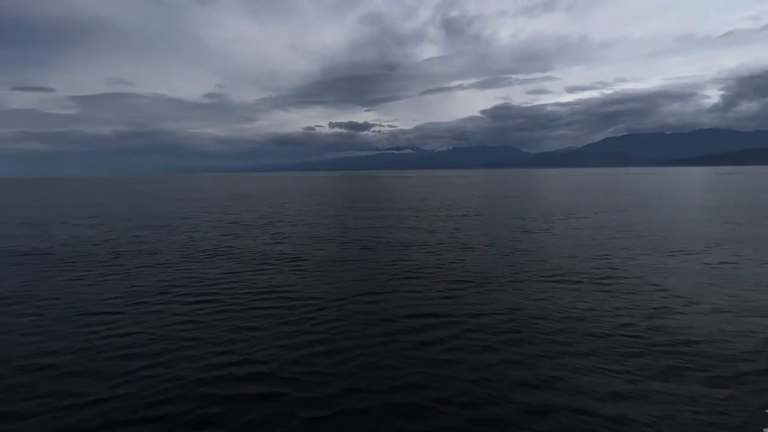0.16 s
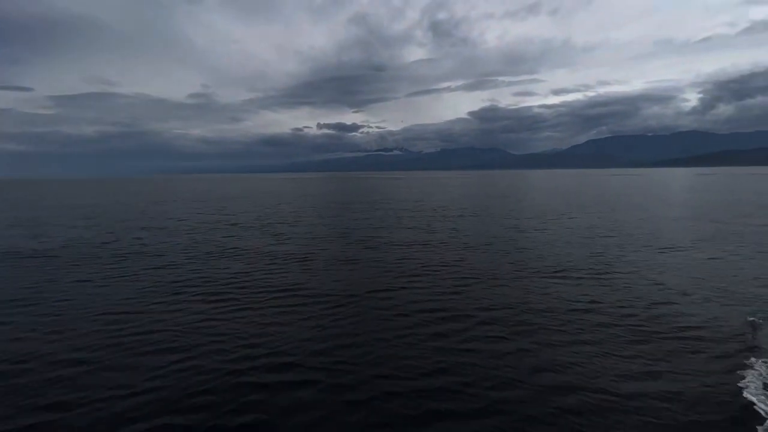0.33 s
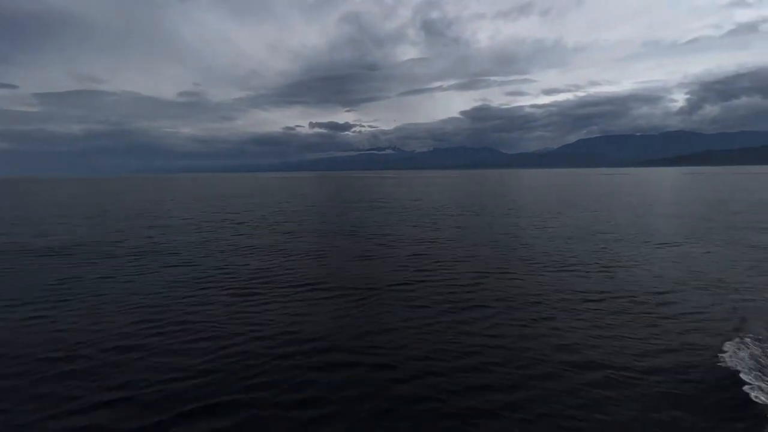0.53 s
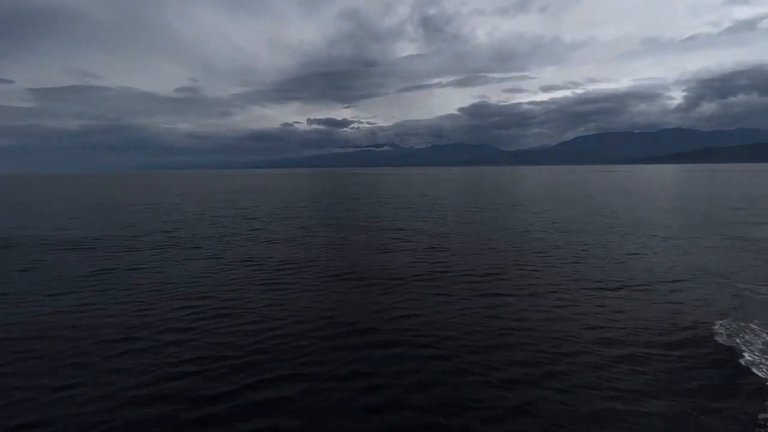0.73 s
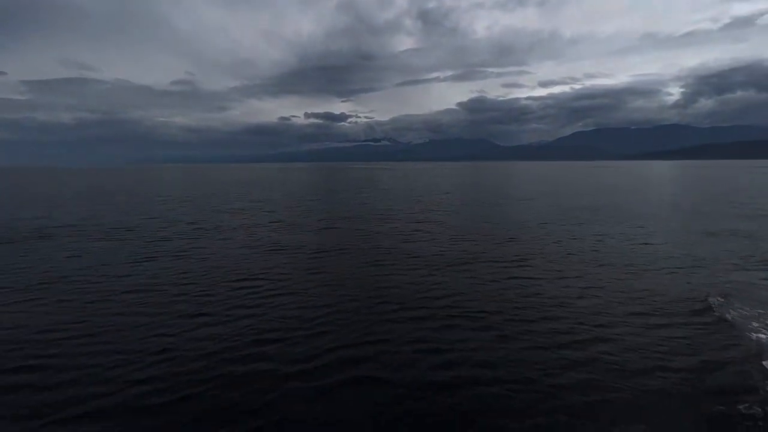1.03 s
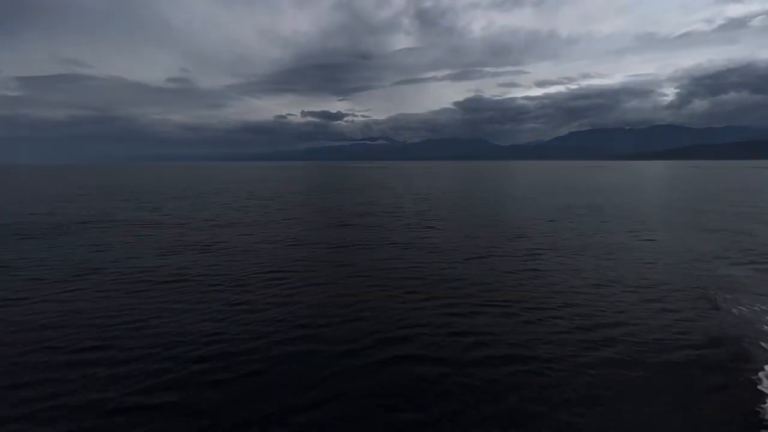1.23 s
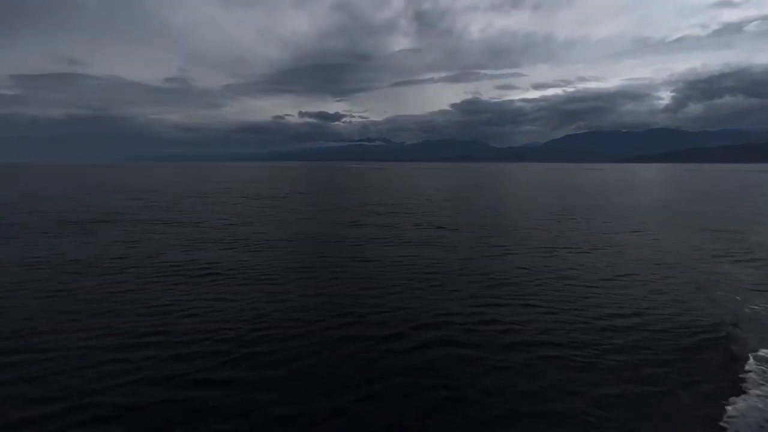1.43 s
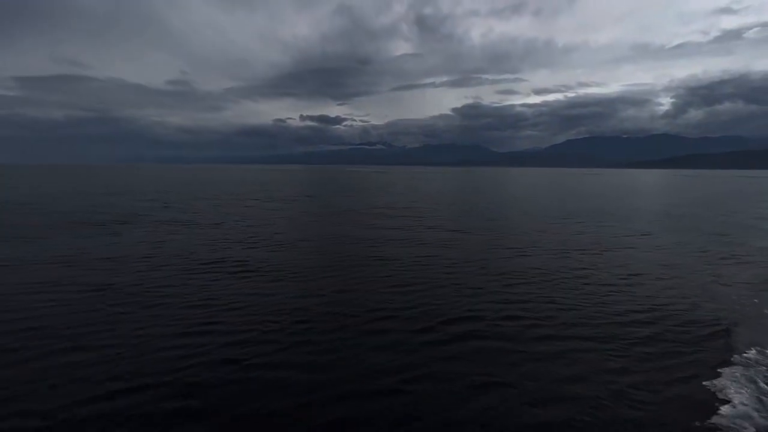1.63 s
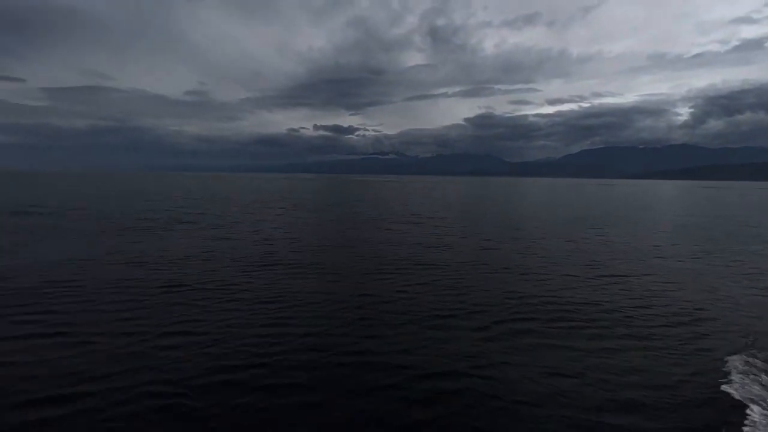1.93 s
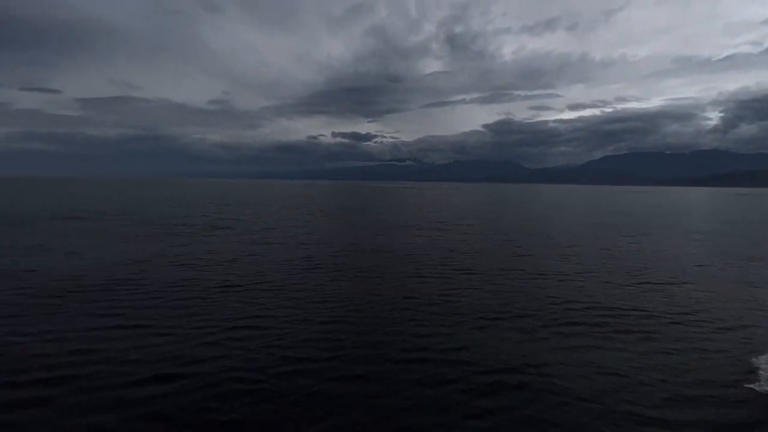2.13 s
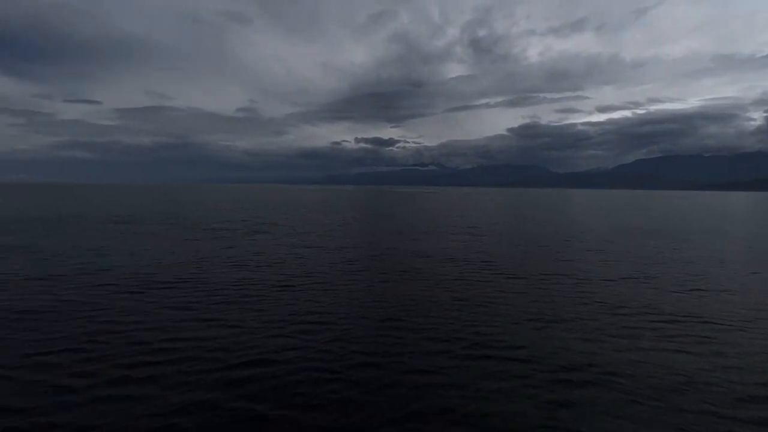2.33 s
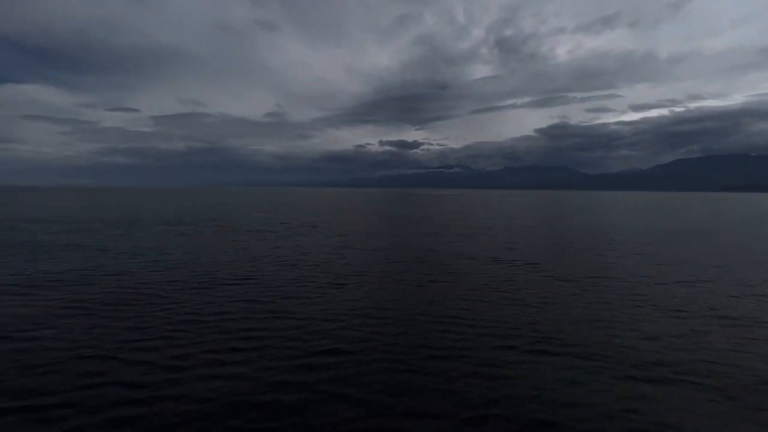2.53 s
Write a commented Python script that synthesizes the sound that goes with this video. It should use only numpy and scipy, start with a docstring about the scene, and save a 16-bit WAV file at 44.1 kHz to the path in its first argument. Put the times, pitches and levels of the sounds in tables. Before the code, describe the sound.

Water churns and bubbles along a moving boat's hull, mostly to the left, over a low engine drone and wind buffeting the microphones; hard thumps come early, then a wave crest breaks in hissing, splashing foam.

```python
"""On the deck of a moving boat, with two microphone ports open to the wind and the bow wave off to the left.
From the start the engine drones below, wind rumbles and buffets the ports, and bubbly water churns along the hull.
At about 0.6 s comes a hard thump, then a cluster of them from 0.8 to 0.9 s; a few air pockets gurgle in the churn.
At about 1 s a crest breaks: a long foam hiss with splashing drops swells, spurts and dies away by 2.6 s.
Engine and hums are sine tones, thumps and gurgles short sines, wind coloured noise, water noise plus bubbles."""
import sys
import numpy as np
from scipy import signal
from scipy.fft import rfft, irfft, next_fast_len
from scipy.io import wavfile
from scipy.ndimage import uniform_filter1d, map_coordinates

SR = 44100
rng = np.random.default_rng(int(sys.argv[2]) if len(sys.argv) > 2 else 0)


def dump_mix(stems):
    """Bounce the given channels to the path in sys.argv[1] as a 16-bit WAV at rate SR."""
    frames = np.atleast_2d(stems).T  # one column per channel
    limited = np.clip(frames, -1, 1)  # hard clip at full scale
    pcm = np.round(limited * 32767).astype(np.int16)
    wavfile.write(sys.argv[1], SR, pcm)


N = 117747


def amp(db):
    """Decibels to gain."""
    return 10 ** (np.asarray(db) / 20)


def unit(x):
    """Scaled to rms 1."""
    return x / np.sqrt(np.mean(x ** 2) + 1e-20)


def seconds():
    """Time of every sample, in seconds."""
    return np.arange(N) / SR


def along(points, hz):
    """Values of (frequency, value) points, interpolated on a log frequency axis."""
    f, v = np.transpose(points)
    return np.interp(np.log(hz + 1), np.log(f + 1), v)


def sides(db):
    """Left and right gains for a level difference, left over right."""
    return amp(np.array([[.5], [-.5]]) * db)


def wobble(rate):
    """A smooth random curve with this many knots a second."""
    return map_coordinates(rng.standard_normal(1024), [np.arange(N) * rate / SR + 2], mode="wrap")


def filtered(x, response):
    """x shaped by a (complex) response of frequency."""
    m = next_fast_len(N + SR // 2)
    return irfft(rfft(x, m) * response(np.fft.rfftfreq(m, 1 / SR)), m)[..., :N]


# firing rate and its octave, at the deck: one rms level each [dB]
ENGINE_LEVELS = [-24, -46.5]
# weaker hums of the machinery: (frequency [Hz], rms level [dB])
MACHINE_HUMS = [(44, -38.5), (139, -37)]
ENGINE_HZ = 73.06
ENGINE_LEAD_S = 0.00073  # the left port hears the drone first


def engine():
    """A steady low drone at the firing rate and its octave, wavering slightly, with weaker hums beside it."""
    turns = np.cumsum(ENGINE_HZ * (1 + 0.0016 * wobble(4.3))) / SR
    turns = turns + ENGINE_HZ * ENGINE_LEAD_S * np.array([[.5], [-.5]])
    drone = 0
    for harmonic, db in enumerate(ENGINE_LEVELS, start=1):
        drone = drone + amp(db + 0.73 * wobble(10.47)) * np.sin(2 * np.pi * harmonic * turns)
    hums = 0
    for hz, db in MACHINE_HUMS:
        level = amp(db + wobble(7.3))
        hums = hums + level * np.sin(2 * np.pi * hz * seconds() + wobble(8.06))
    return np.sqrt(2) * (drone + hums)  # from rms to peak


# wind at the two ports: (frequency [Hz], share common to both [0-1])
COMMON_WIND = [(40, 0), (55, 0.07), (105, 0.07), (160, 0.39), (300, 0.56)]


def on_the_ports(spectrum):
    """Lumpy wind noise of rms 1, partly different on each port."""
    x = filtered(rng.standard_normal((3, N)), lambda hz: amp(along(spectrum, hz)))
    alike = lambda hz: np.clip(along(COMMON_WIND, hz), 0, 1)
    common = filtered(x[0], lambda hz: np.sqrt(alike(hz)))
    separate = filtered(x[1:], lambda hz: np.sqrt(1 - alike(hz)))
    lumps = amp(1.05 * np.array([wobble(34.96), wobble(34.73)]))
    return unit((common + separate) * lumps)


# colour of the steady wind: (frequency [Hz], relative level per Hz [dB])
RUMBLE_COLOUR = [(20, -37), (32, -22), (42, -9), (55, 5), (72, -0.5), (95, 5.5), (140, -3), (200, -3),
                 (300, -6.5), (450, -19), (800, -28), (2000, -72)]
# colour of the gusts: (frequency [Hz], relative level per Hz [dB])
GUST_COLOUR = [(40, -15), (75, 3), (110, 2), (165, 1), (300, -7.5), (450, -14), (800, -29.5), (2000, -58)]
# gusts on the ports: (time [s], half length [s], level [dB], left over right [dB])
PORT_GUSTS = [(0.006, 0.023, -25.5, 5.5), (0.12, 0.044, -25, 1.5), (0.307, 0.038, -30, 5),
              (0.617, 0.022, -23, -3), (0.728, 0.038, -25.5, -4.5), (0.834, 0.062, -24.5, 0),
              (1.138, .05, -25.5, -3), (1.23, 0.019, -24.5, 1), (1.472, 0.025, -24.5, 5.5),
              (1.803, 0.061, -22.5, -4), (1.972, 0.074, -21.5, 3), (2.152, 0.045, -26.5, -4.5),
              (2.421, 0.042, -25, 12), (2.536, 0.055, -26, -2)]
WIND_DB = -28  # the steady rumble


def wind():
    """A steady deep rumble, and gusts that buffet the ports higher up: noise whose power swells in brief bumps."""
    t = seconds()
    gust_power = 0
    for s, half, db, pan in PORT_GUSTS:
        bump = np.exp(-((t - s) / half) ** 2)
        gust_power = gust_power + (amp(db) * sides(pan)) ** 2 * bump
    rumble = amp(WIND_DB) * on_the_ports(RUMBLE_COLOUR)
    return rumble + np.sqrt(gust_power) * on_the_ports(GUST_COLOUR)


# eddies on a port or water slapping the hull:
# (time [s], pitch at that time [Hz], envelope level [dB], left over right [dB])
HARD_THUMPS = [(.602, 232, -8.5, 0.5), (0.778, 350, -27.5, 24), (0.804, 105, -13, -9),
               (0.846, 88, -12.5, 2), (0.896, 232, -18, -4)]
THUMP_CYCLES, THUMP_SAG = 0.69, 0.17  # half length [cycles]; share of pitch lost over it


def thumps():
    """Each thump is a push of a cycle or two that falls in pitch."""
    out = np.zeros((2, N))
    for s, hz, db, pan in HARD_THUMPS:
        age = (seconds() - s) * hz / THUMP_CYCLES  # in half lengths
        push = np.sin(2 * np.pi * THUMP_CYCLES * age * (1 - THUMP_SAG * age / 2))
        out += amp(db) * sides(pan) * np.exp(-age ** 2) * push
    return out


# larger air pockets in the churn:
# (time [s], starting pitch [Hz], peak level [dB], left over right [dB])
AIR_POCKETS = [(0.236, 1244, -34.5, 7), (.885, 718, -32.5, 4), (1.53, 939, -32, 5)]
GURGLE_SWELL_S, GURGLE_RISE_PER_S = 0.012, .6  # time to the peak; share of pitch gained a second
GURGLE_ROUGH = 0.63  # phase jitter [rad]


def gurgles():
    """Larger pockets of air ring briefly above the churn, unsteady and rising in pitch."""
    out = np.zeros((2, N))
    for s, hz, db, pan in AIR_POCKETS:
        age = np.maximum(seconds() - s, 0)
        swell = age / GURGLE_SWELL_S * np.exp(1 - age / GURGLE_SWELL_S)
        phase = 2 * np.pi * hz * age * (1 + GURGLE_RISE_PER_S * age / 2)
        phase = phase + GURGLE_ROUGH * wobble(150)
        out += amp(db) * sides(pan) * swell * np.sin(phase)
    return out


def patchy(patchy_db):
    """Three unrelated noises (shared, left, right) with the same patches of random gain in time and frequency."""
    z = signal.stft(rng.standard_normal((3, N)), nperseg=512)[2]
    field = rng.standard_normal(z.shape[1:])
    field = uniform_filter1d(field, size=7, axis=0)  # across frequency
    field = uniform_filter1d(field, size=6, axis=1)  # across time
    noises = signal.istft(z * amp(patchy_db * unit(field)), nperseg=512)[1]
    return unit(noises[:, :N])


BUBBLE_RISE = 0.18  # share of pitch gained per decay length, over the first two


def bubbles(per_s, hz, cycles, spread_db, size):
    """Three unrelated streams of bubbles: damped sines that rise in pitch, higher ones starting louder."""
    u = rng.random((int(3 * per_s * N / SR), 4))
    pitch = np.minimum(hz * 3 ** (2 * u[:, 1:2] - 1), SR / 3)  # a third to three times hz
    turns = pitch * np.arange(size) / SR
    age = turns / cycles
    strength = amp(-spread_db * np.log(0.049 + u[:, 2:3])) * pitch / hz
    tone = np.sin(2 * np.pi * turns * (1 + BUBBLE_RISE * np.minimum(age, 2) / 2))
    envelope = np.exp(-np.pi * age) * (1 - np.exp(-2 * turns))
    ring = strength * tone * envelope
    at = (u[:, :1] * 3 * N).astype(int) + np.arange(size)  # the streams lie end to end
    return unit(np.bincount(at.ravel(), ring.ravel(), 3 * N)[:3 * N].reshape(3, N))


# how the water reaches the ports: (frequency [Hz], left over right [dB])
PORT_SHADE = [(200, -0.5), (500, 6), (800, 8.5), (1200, 6), (1700, 5), (2300, 2), (3100, 3.5), (3700, 6),
              (5200, 8), (6850, 9), (7700, 7), (9200, -7.5), (11000, 1.5), (13000, -0.5)]
# straight from the wave, before each layer's directness: (frequency [Hz], share [0-1])
DIRECT_SHARE = [(300, 0.42), (1000, 0.49), (1700, 0.35), (2200, 1), (2900, 0.33), (4500, 0.5), (9000, 0.21)]
WATER_LEAD_S = 0.00026  # the left port hears the wave first


def from_the_side(streams, spectrum, directness):
    """Coloured water at the ports: part direct and earlier on the left, part diffuse, then unequal port levels."""
    x = unit(filtered(streams, lambda hz: amp(along(spectrum, hz))))
    share = lambda hz: np.clip(directness * along(DIRECT_SHARE, hz), 0, 1)
    lead = lambda hz: np.exp(np.pi * 1j * hz * WATER_LEAD_S * np.array([[1], [-1]]))
    direct = filtered(x[0], lambda hz: np.sqrt(share(hz)) * lead(hz))
    diffuse = filtered(x[1:], lambda hz: np.sqrt(1 - share(hz)))
    return filtered(direct + diffuse, lambda hz: sides(along(PORT_SHADE, hz)))


def fizz():
    """Hiss full of tiny bursting bubbles."""
    tiny = bubbles(per_s=2300, hz=4550, cycles=2.3, spread_db=2, size=120)
    return patchy(patchy_db=2.0) + amp(-7.5) * tiny


# the bow wave along the hull: (time [s], churning water level [dB], trailing foam level [dB])
BOW_WAVE = [(0, -33.5, -35.5), (.15, -35, -40.5), (.25, -31, -39.5), (.3, -34.5, -38), (.39, -33.5, -38.5),
            (.45, -33.5, -37), (.55, -33, -37), (.66, -34.5, -39), (1.11, -36, -40), (1.23, -31, -38.5),
            (1.38, -30.5, -37.5), (1.53, -27.5, -38.5), (1.7, -28, -35.5), (1.88, -30, -39),
            (2.03, -28.5, -34.5), (2.2, -32, -40), (2.35, -31.5, -40.5), (2.5, -30.5, -37.5),
            (2.67, -29.5, -37.5)]
# colour of the churning water: (frequency [Hz], filter gain [dB])
CHURN_COLOUR = [(90, -17), (220, -3), (450, -3), (700, -6), (1000, -7), (1350, -9.5), (1900, -18),
                (3000, -36), (6000, -59)]
# colour of the trailing foam: (frequency [Hz], filter gain [dB])
FOAM_COLOUR = [(500, -14), (1200, -5), (2000, -2.5), (2620, -1.5), (3000, -4.5), (3800, -8.5), (4500, -9),
               (5200, -9), (6300, -12.5), (7700, -14), (9000, -14.5), (10300, -25), (12000, -15),
               (15500, -29.5)]
CHURN_DIRECT, FOAM_DIRECT = 0.6, 0.23  # relative to the crest: both are spread more widely


def wake():
    """Churning water full of bubbles, and the fizz of its trailing foam, both wavering in level."""
    s, *levels = np.transpose(BOW_WAVE)
    churn_db, foam_db = [np.interp(seconds(), s, level) for level in levels]
    bubbling = bubbles(per_s=450, hz=854.4, cycles=8.9, spread_db=2.0, size=1200)
    churn = from_the_side(patchy(patchy_db=1.26) + amp(-8) * bubbling, CHURN_COLOUR, CHURN_DIRECT)
    foam = from_the_side(fizz(), FOAM_COLOUR, FOAM_DIRECT)
    return amp(churn_db + 0.44 * wobble(21.77)) * churn + amp(foam_db + 0.66 * wobble(24.43)) * foam


# spurts of spray within the breaking crest: (time [s], half length [s], rise [dB])
SPRAY_SPURTS = [(1.226, 0.064, 3.5), (1.563, 0.026, 2.5), (1.764, 0.018, 4), (1.877, 0.014, 5)]
# colour of the breaking crest: (frequency [Hz], filter gain [dB])
CREST_COLOUR = [(500, -7.5), (1000, -4.5), (1500, -0.5), (1850, 0.5), (2200, -1), (2650, 1.5), (3250, -1),
                (3750, -6.5), (5000, -7), (6000, -9.5), (6800, -8.5), (7400, -16.5), (9000, -11),
                (10300, -17.5), (12000, -16.5), (15500, -38)]
BREAK_S, BREAK_RISE_S, BREAK_HOLD_S, BREAK_FALL_S = 1.027, 0.45, 0.43, 0.65
BREAK_DB = -32  # held level between spurts
SPLASH_DB = -8.5  # drops against the hiss
SPLASH_CLUMP_DB, SPLASH_CLUMPS_PER_S = 3, 25  # the drops fall in clumps


def breaker():
    """The crest spills over: patchy hiss and splashing drops swell, hold with a few spurts, and die away."""
    t = seconds()
    corners = BREAK_S + np.cumsum([0, BREAK_RISE_S, BREAK_HOLD_S, BREAK_FALL_S])
    swell = np.interp(t, corners, [0, 1, 1, 0])
    spurt_db = sum(rise * np.exp(-((t - s) / half) ** 2) for s, half, rise in SPRAY_SPURTS)
    drops = bubbles(per_s=700, hz=2933, cycles=14.4, spread_db=2.5, size=600)
    clumps = amp(SPLASH_DB + SPLASH_CLUMP_DB * wobble(SPLASH_CLUMPS_PER_S))
    spray = patchy(patchy_db=2.0) + clumps * drops
    return swell * amp(BREAK_DB + spurt_db) * from_the_side(spray, CREST_COLOUR, directness=1)


def scene():
    """Engine, wind and water together on the deck."""
    return engine() + wind() + thumps() + gurgles() + wake() + breaker()


LOW_CUT_HZ, TOP_HZ = 35, 15800


def record(dry):
    """The microphones lose the deepest rumble and pass nothing above their band limit."""
    return filtered(dry, lambda hz: (hz < TOP_HZ) * (1 - np.exp(-(hz / LOW_CUT_HZ) ** 6)))


dry = scene()
out = record(dry)
dump_mix(out)
```